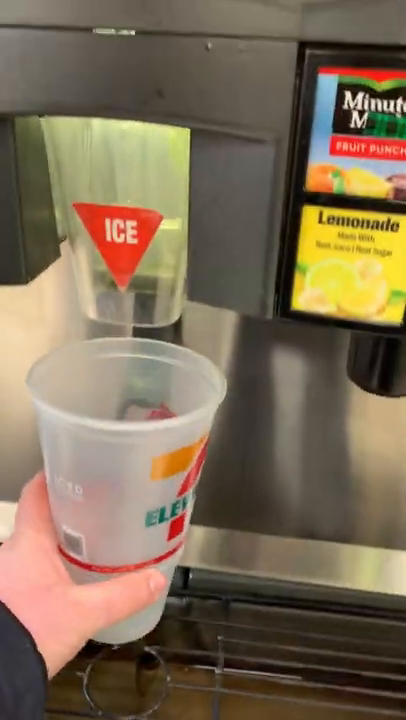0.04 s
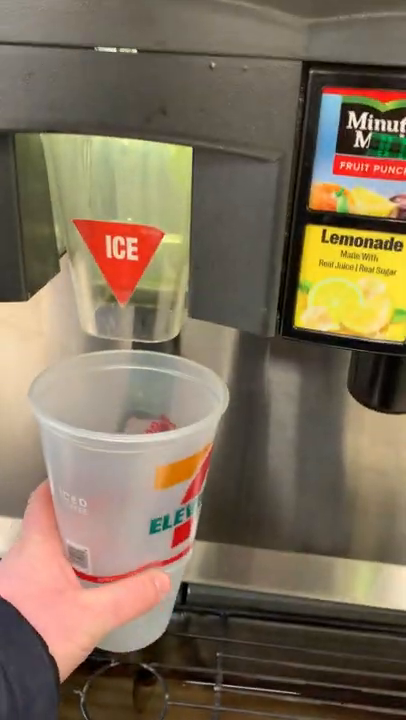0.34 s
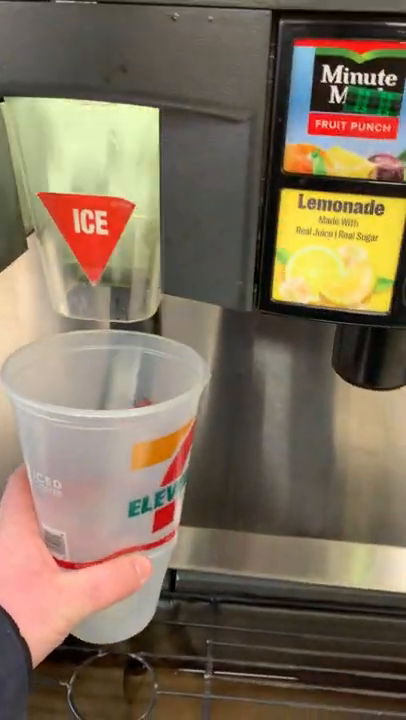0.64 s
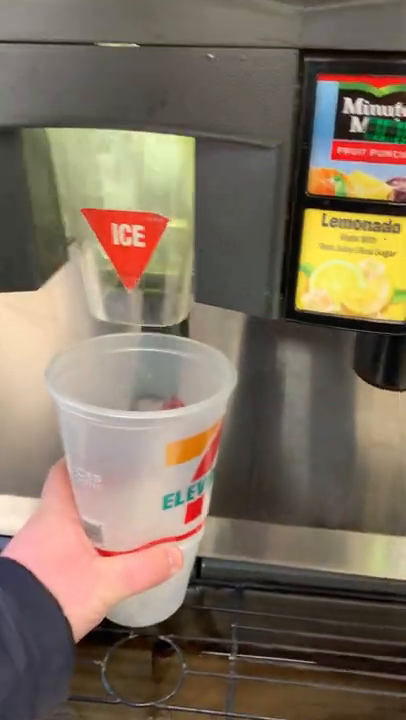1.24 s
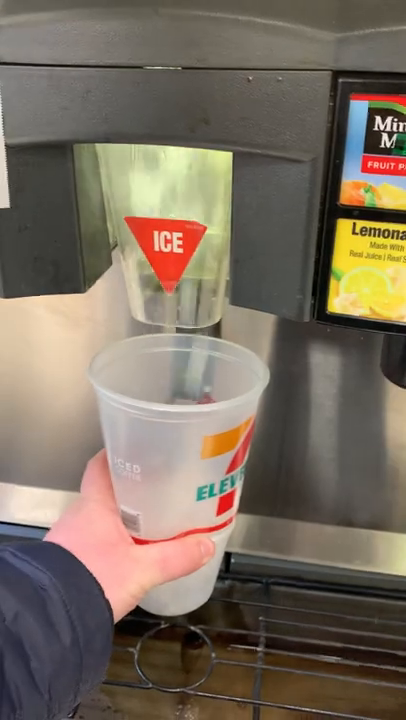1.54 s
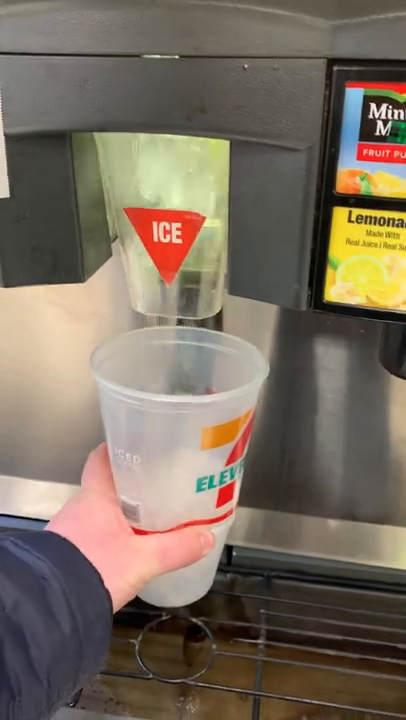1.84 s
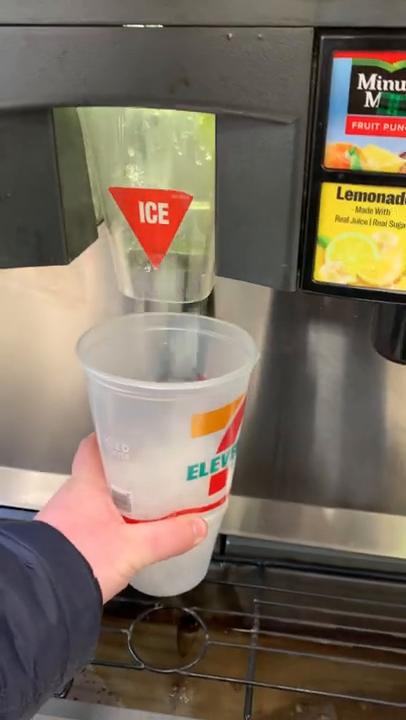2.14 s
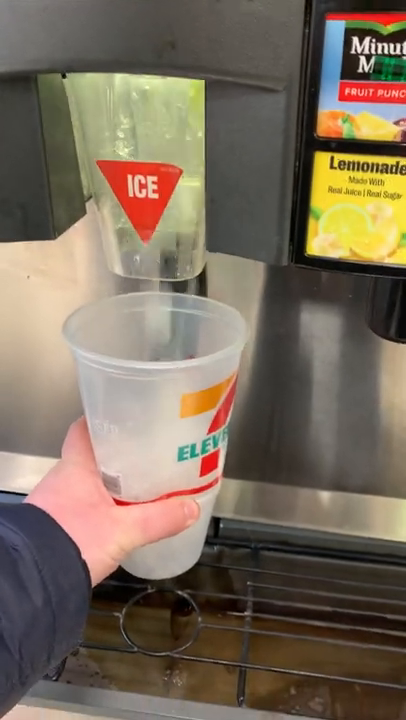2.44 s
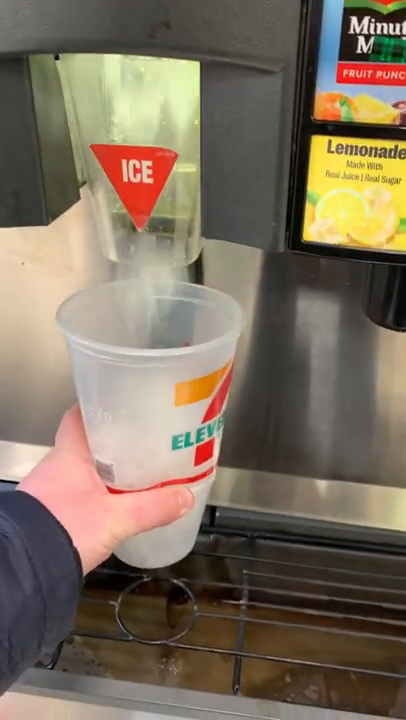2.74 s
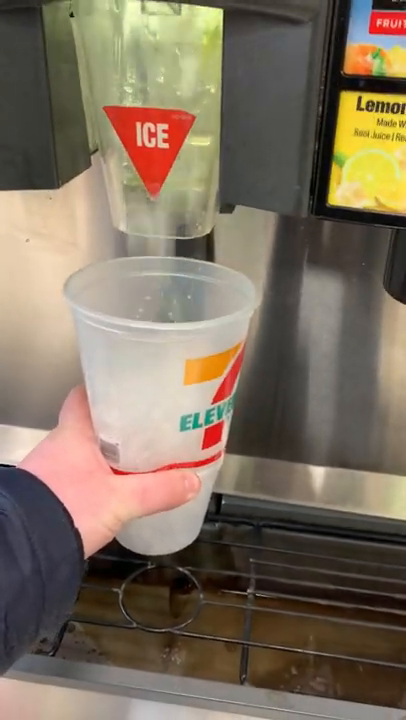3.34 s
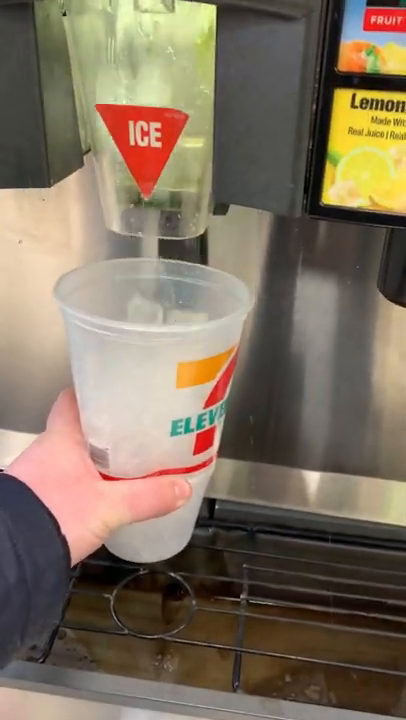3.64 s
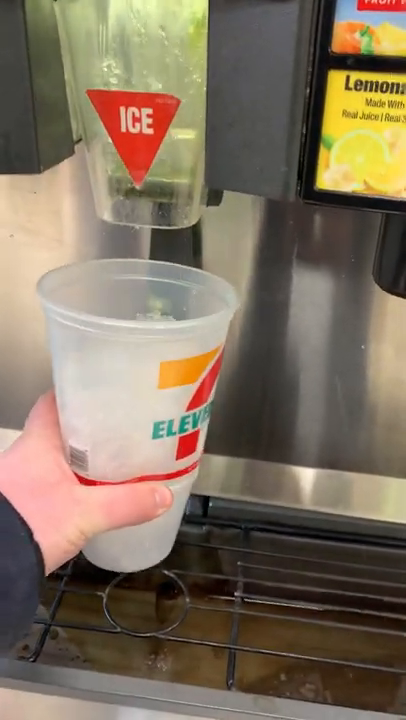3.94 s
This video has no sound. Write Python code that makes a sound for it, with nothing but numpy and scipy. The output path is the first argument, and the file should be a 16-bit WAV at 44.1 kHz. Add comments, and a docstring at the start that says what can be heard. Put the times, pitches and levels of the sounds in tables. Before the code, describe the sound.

Ice pours from a shop's drinks machine into a plastic cup close to the microphone. A lever clacks, ice slides down the chute and rattles steadily in, then a flap slaps shut. The machine hums low throughout.

```python
"""At a shop's drinks fountain, ice drops into a hand-held plastic cup close by.
The lever clacks, ice slides down the chute and pours in a rattling rush of small impacts. Big pieces
knock on the pile and excite the modes of the cup's bottom, which goes dead as it fills. The flap slaps
shut. The machine hums throughout; its steel recess and the shop reflect the ice and the clacks."""
import sys
import numpy as np
from scipy import signal
from scipy.fft import rfft, irfft, next_fast_len
from scipy.io import wavfile
from scipy.ndimage import uniform_filter1d, map_coordinates

SR = 44100
rng = np.random.default_rng(int(sys.argv[2]) if len(sys.argv) > 2 else 0)


def generate_wav(sig):
    """Save sig (samples, or channels by samples) to the path in sys.argv[1] as 16-bit PCM at SR."""
    pcm = np.round(np.clip(np.atleast_2d(sig).T, -1, 1) * 32767).astype(np.int16)
    wavfile.write(sys.argv[1], SR, pcm)


N = 176400
T = np.arange(N) / SR
FFT_SIZE = next_fast_len(N + SR // 2)
HZ = np.fft.rfftfreq(FFT_SIZE, 1 / SR)
SLIDE_START_S, TOP_HZ = 0.551, 15850

# Spectrum of small ice chips cracking. Each row: frequency in Hz, level in dB.
CRACK_SPECTRUM = [(300, -11.5), (1200, -32), (2400, -3.5), (3700, 2.5), (5000, 0.5), (6500, 0.5), (8500, 3),
                  (11000, 0), (13000, -2), (16000, -4)]
# Spectrum of larger pieces clacking. Each row: frequency in Hz, level in dB.
CLACK_SPECTRUM = [(150, -45), (350, -5), (650, -0.5), (900, 2.5), (1100, -2.5), (1600, 0), (2100, -3.5),
                  (2700, -10), (3600, -5.5), (6000, -16.5)]
# The cup's modes: its loaded bottom, the bottom's lingering ring, its wall.
# Each row: frequency in Hz, level in dB, T60 in seconds.
CUP_MODES = [(520, 4.5, 0.041), (517, -10, 0.11), (946, -7.5, 0.051)]


def amp(db):
    """Decibels to amplitude ratio."""
    return 10 ** (np.asarray(db) / 20)


def unit(x):
    """Normalisation to an rms of 1."""
    return x / np.sqrt(np.mean(x ** 2) + 1e-20)


def spectrum(points):
    """Gain per frequency, from (Hz, dB) points interpolated on a logarithmic frequency axis."""
    hz, db = np.transpose(points)
    return amp(np.interp(np.log(HZ + 1), np.log(hz + 1), db))


def curves(rows):
    """Linear interpolation in time: one value per sample for each column after the first."""
    times, *columns = np.transpose(rows)
    return [np.interp(T, times, column) for column in columns]


def wobble(knots_per_s):
    """Slow random modulation: a spline through Gaussian values."""
    return map_coordinates(rng.standard_normal(200), [T * knots_per_s], mode="mirror")


def filtered(x, response):
    """Linear filtering: the spectrum of x times a frequency response."""
    return irfft(rfft(x, FFT_SIZE) * response, FFT_SIZE)[..., :N]


def noise(gain):
    """White noise shaped by a gain per frequency, at an rms of 1."""
    return unit(filtered(rng.standard_normal(N), gain))


def resonance(centre_hz, width_hz):
    """The band-pass response of a damped oscillator."""
    return 1j * HZ * width_hz / (centre_hz ** 2 - HZ ** 2 + 1j * HZ * width_hz)


def add(track, start_s, sound):
    """Superposition of a sound on a track."""
    part = track[max(round(start_s * SR), 0):][:len(sound)]
    part += sound[:len(part)]


def strike(t60, rise_s):
    """The envelope of an impact: a quick rise and an exponential decay of 60 dB in t60 seconds."""
    t = T[:SR // 3]
    return 1000 ** (-t / t60) * (1 - np.exp(-t / rise_s))


def ring(modes, rise_s, detune):
    """Free vibration after a blow: a sum of damped modes, each varied a little in level and pitch."""
    t = T[:SR // 3]
    return sum(amp(db + rng.normal(0, 0.56)) * strike(t60, rise_s)
               * np.sin(2 * np.pi * hz * (1 + detune * rng.normal()) * t) for hz, db, t60 in modes)


def rattle(times, sizes_db, t60):
    """Incoherent contacts add in power; their envelope is levelled to a steady mean over 50 ms."""
    hits = np.bincount((times * SR).astype(int), amp(sizes_db) ** 2, N)
    power = np.abs(signal.fftconvolve(hits, strike(t60, 0.00035) ** 2)[:N])
    mean_power = np.abs(uniform_filter1d(power, size=2200))
    return np.sqrt(power / (mean_power + 1e-12))


def tinkle(times, sizes_db, centre_hz, spread, t60):
    """Each contact excites one damped mode, its frequency drawn from a log-normal distribution."""
    t = T[:SR // 25]
    hz = np.clip(centre_hz * np.exp(spread * rng.standard_normal((len(times), 1))), 0, TOP_HZ)
    waves = amp(sizes_db)[:, None] * np.sin(2 * np.pi * hz * t) * 1000 ** (-t / t60)
    samples = (times * SR).astype(int)[:, None] + np.arange(len(t))
    return unit(np.bincount(samples.ravel(), waves.ravel(), N)[:N])


def microphone_pair(x, side):
    """Phase difference places a sound left (side 1) or right (-1); the level balance is alike for both."""
    # For a source on the left. Each row: frequency in Hz, phase lead of the left channel in radians.
    phase_lead = [(150, 0), (850, -.9), (1400, -.8), (2100, .5), (2500, 1.9), (3400, 1.5), (4700, 3.14),
                  (6650, 6.28), (8900, 9.42), (13200, 15.71), (15200, 18.85)]
    # Channel balance. Each row: frequency in Hz, left minus right level in dB.
    balance = [(100, 0), (400, -1), (1200, -1), (1800, -2.8), (2300, -5), (3200, 0)]
    phase = side * np.interp(HZ, *np.transpose(phase_lead))
    share = np.array([[0.5], [-0.5]])
    return filtered(x, np.exp(1j * share * phase) * spectrum(balance) ** share)


def reflections(x, t60, shifts=20):
    """Diffuse reverberation above the bass; cross-faded tails shift its pattern as cup and pile move."""
    reflected = np.zeros(N)
    step = N // shifts
    for k in range(shifts + 1):
        span = np.arange(max(k - 1, 0) * step, min((k + 1) * step, N))
        tail = strike(t60, 0.0031) * rng.standard_normal(SR // 3)
        fade = np.cos(np.pi / 2 * (span / step - k))
        add(reflected, span[0] / SR, signal.fftconvolve(x[span] * fade, tail / np.linalg.norm(tail)))
    return filtered(reflected, HZ / (HZ + 400))


def machine():
    """Mains and motor hum form a line spectrum over broadband fan noise; a low whir enters at the end."""
    # Level of the hum and rumble as heard, dipping after the loud clacks and the first ice.
    # Each row: time in seconds, hum level in dB, rumble level in dB.
    levels = [(0.04, -27.5, -27.5), (0.48, -26, -29.5), (0.6, -41, -36.5), (0.68, -29, -22.5),
              (0.99, -53, -49), (1.4, -37, -33.5), (2.64, -41, -31), (3.62, -34.5, -31.5), (3.77, -38, -32),
              (3.84, -43, -38.5), (4.0, -41.5, -33.5)]
    # Tones of the mains and the motor. Each row: frequency in Hz, level in dB.
    hum_lines = [(59, -18.5), (99, -19.5), (120, -2.5)]
    # Spectra of the fans' rumble and hiss. Each row: frequency in Hz, level in dB.
    rumble_spectrum = [(42, -46), (55, 1), (75, -4), (100, 4), (140, 0.5), (175, -6.5), (225, -1.5),
                       (350, -5.5), (600, -17.5), (1500, -24.5), (4000, -32), (16000, -49.5)]
    hiss_spectrum = [(300, -5), (1000, 3.5), (2500, -12), (4500, -5), (7500, -29), (10000, -10.5),
                     (16000, -17)]
    waver_db, whir_hz, whir_start_s = 2.5, 187, 3.75
    hum_db, rumble_db = curves(levels)
    hum = np.zeros(N)
    for hz, db in hum_lines:
        waver = waver_db * wobble(9) * (T > SLIDE_START_S)
        hum += np.sqrt(2) * amp(db + waver) * np.sin(2 * np.pi * (hz * T + rng.random()))
    whir_onset = np.clip((T - whir_start_s) / 0.019, 0, 1)
    whir = amp(-40.5) * np.sqrt(2) * np.sin(2 * np.pi * whir_hz * T) * whir_onset
    rumble = amp(rumble_db - 4) * noise(spectrum(rumble_spectrum))
    hiss = amp(-52.5) * noise(spectrum(hiss_spectrum))
    return amp(hum_db) * hum + whir + rumble + hiss


def lever_and_flap():
    """Friction scrapes the lever to its stop; impacts excite the modes of lever, flap and housing."""
    # Lever and flap impacts. Each row: start in seconds, treble in dB, body in dB, rise in seconds.
    clacks = [(0.264, -27, -51, 0.0014), (0.429, -7, -10, 0.0033), (0.449, -28, -8, 0.0034),
              (.459, -6, -22, 0.00058), (0.5667, -34.5, -33, 0.00091), (3.718, -9.5, -24, 0.0011),
              (3.726, -11, -14, 0.0017), (3.915, -23, -30.5, 0.00073)]
    # Blows to the housing. Each row: start in seconds, level in dB.
    thuds = [(0.454, -24), (3.726, -17)]
    # Modes of the three struck parts. Each row: frequency in Hz, level in dB, T60 in seconds.
    lever_modes = [(1170, -4, 0.011), (1985, -21, 0.076), (5160, -18, 0.049), (7330, -11, 0.032),
                   (14600, -4, 0.02)]
    flap_modes = [(1228, 2, 0.031), (1780, -10, 0.097)]
    housing_modes = [(135.6, -0.5, 0.33), (186.4, -5, 0.37), (345, -5.5, 0.11)]
    scrape_peak_s, scrape_db_per_s, flap_shut_s = 0.4305, 1000, 3.727
    sharp_share, settle_s = 0.11, 0.035  # a thud starts sharp and sags to its pitch
    treble, body, rings = np.zeros((3, N))
    scrape = amp(-24.5 - scrape_db_per_s * np.abs(T - scrape_peak_s))
    for start, treble_db, body_db, rise_s in clacks:
        add(treble, start, amp(treble_db) * strike(0.042, rise_s))
        add(body, start, amp(body_db) * strike(0.043, rise_s))
        add(rings, start, amp(treble_db + 1.5) * ring(lever_modes, rise_s, detune=0.0052))
    add(rings, flap_shut_s, amp(-14) * ring(flap_modes, rise_s=0.0009, detune=0))
    for start, db in thuds:
        thud = ring(housing_modes, rise_s=0.0088, detune=0.008)
        t = T[:len(thud)]
        warped_time = t + sharp_share * settle_s * (1 - np.exp(-t / settle_s))
        add(rings, start, amp(db) * np.interp(warped_time, t, thud))
    treble_noise = (treble + scrape) * noise(spectrum(CRACK_SPECTRUM))
    body_noise = (body + scrape / 2) * noise(spectrum(CLACK_SPECTRUM))
    return treble_noise + body_noise + rings


def chute_slide():
    """Sliding friction and tumbling impacts swell until the ice leaves the chute's mouth."""
    # Spectrum of ice scraping the chute. Each row: frequency in Hz, level in dB.
    friction_spectrum = [(200, 2.5), (700, -1), (1200, 0), (2000, -7), (2700, -8.5), (4000, -5),
                         (7000, -11), (11000, -7.5), (16000, -18)]
    end_s, swell_db_per_s, tumbles = 0.769, 60, 36
    swell_db = -swell_db_per_s * np.abs(T - end_s)
    gate = np.interp(T, [SLIDE_START_S - 0.03, SLIDE_START_S + 0.062, end_s, end_s + 0.026], [0, 1, 1, 0])
    when, size = rng.random((tumbles, 2)).T
    length_s = end_s - SLIDE_START_S
    bumps = tinkle(SLIDE_START_S + when * length_s, 10 * size, centre_hz=1054, spread=0.28, t60=0.042)
    bumps *= np.sqrt(length_s / T[-1])  # rms near 1 within the slide
    friction = noise(spectrum(friction_spectrum))
    return gate * (amp(-26.5 + swell_db) * friction + amp(-32.5 + swell_db / 2) * bumps)


def ice_pour():
    """Random impacts crack, clatter and drive the cup's modes, which give way to the pile as it fills."""
    # Strength of the pour. Each row: time in seconds, chips' treble in dB, pieces' midrange in dB.
    flow = [(0.75, -70, -55), (0.84, -24.5, -25.5), (0.98, -31.5, -37.5), (1.19, -34, -42),
            (1.44, -35, -40), (1.61, -33.5, -39), (1.96, -32.5, -40.5), (2.56, -33, -41.5),
            (3.19, -33.5, -41.5), (3.43, -35, -45), (3.61, -33.5, -42.5), (3.85, -38.5, -47),
            (4.0, -44, -56)]
    # Clumps and gaps in the flow. Each row: centre in seconds, gain in dB, half length in seconds.
    clumps = [(1.305, -7.5, 0.032), (1.392, -14, 0.013), (1.44, 5.5, 0.038), (1.543, -2.5, 0.022),
              (1.77, 6, 0.053), (2.397, -5, 0.087), (2.528, 3.5, 0.017), (2.771, -8.5, 0.024),
              (2.873, 3.5, 0.022), (3.444, -8.5, 0.015), (3.5, -4.5, 0.023), (3.606, -13, 0.018),
              (3.693, 9, 0.019)]
    contacts_per_s, size_spread_db = 380, 3.5
    first_landing_s, piled_up_s, deadening_db_per_s = 0.84, 2.7, 2.5
    clumps_db = sum(db * np.exp(-((T - centre) / half_length) ** 2) for centre, db, half_length in clumps)
    treble_db, middle_db = curves(flow) + clumps_db
    when, size, weight = rng.random((3, contacts_per_s * N // SR))
    times = when * T[-1]
    size_db = -size_spread_db * np.log(1 - 0.95 * size)  # many small contacts, few large
    weight_db = size_db + 8 * weight
    chips = noise(spectrum(CRACK_SPECTRUM)) * rattle(times, size_db, t60=0.045)
    chips += amp(-9) * tinkle(times, size_db, centre_hz=6495, spread=0.45, t60=0.029)
    shaking = rattle(times, weight_db, t60=0.024)
    clatter = noise(spectrum(CLACK_SPECTRUM)) * shaking
    clatter += amp(2) * tinkle(times, weight_db, centre_hz=1236, spread=0.436, t60=0.04)
    response = sum(amp(db) / (1 + 1j * (HZ - hz) * t60 * np.pi / np.log(1000)) for hz, db, t60 in CUP_MODES)
    cup = unit(filtered(shaking * rng.standard_normal(N), response)) * (T > first_landing_s)
    cup *= amp(4.5 - deadening_db_per_s * (T - first_landing_s))
    filled = np.interp(T, [first_landing_s, piled_up_s], [0, 1])
    pile = amp(1) * filled * shaking * noise(resonance(centre_hz=890, width_hz=480) ** 2)
    start = flow[0][0]
    flowing = np.interp(T, [start - 0.02, start], [0, 1])
    return flowing * (amp(treble_db + 2.5) * chips + amp(middle_db - 2.5) * (clatter + cup + pile))


def big_pieces():
    """Each impact gives a noise burst and rings the piece and the cup's wall; some thump the bottom."""
    # Pieces landing. Each row: start in seconds, pitch in Hz, clack level in dB, crack level in dB.
    knocks = [(0.77, 1215, -12.5, -16), (0.781, 830, -14, -13), (0.79, 865, -16, -19),
              (0.817, 940, -35, -24), (0.836, 910, -12, -15), (0.843, 1205, -10, -26),
              (0.855, 1256, -13.5, -20), (0.873, 1120, -17, -15), (0.962, 880, -27, -25),
              (1.011, 1010, -27.5, -22), (1.172, 1580, -28, -26), (1.333, 916, -24, -25),
              (1.369, 1550, -17.5, -22.5), (1.418, 880, -25, -24.5), (1.433, 1500, -19, -20.5),
              (1.462, 945, -22, -20.5), (1.472, 940, -36, -21.5), (1.5, 930, -23.5, -20),
              (1.556, 940, -53, -23), (1.571, 2350, -25.5, -19.5), (1.577, 1614, -23, -24.5),
              (1.67, 980, -25, -26), (1.725, 1590, -16.5, -23), (1.771, 1240, -26, -22.5),
              (1.787, 1500, -37, -17.5), (1.811, 890, -20, -22), (1.838, 1480, -23, -32),
              (1.9, 1250, -30, -21.5), (2.031, 1180, -26, -21), (2.102, 905, -20.5, -25.5),
              (2.173, 920, -23, -21), (2.239, 1610, -17, -21), (2.393, 1146, -19, -41),
              (2.408, 1763, -18, -17.5), (2.437, 1490, -23.5, -39), (2.473, 974, -21.5, -32),
              (2.499, 851, -27, -34), (2.526, 1530, -18, -27), (2.543, 990, -31, -19),
              (2.631, 1600, -23.5, -29.5), (2.754, 827, -21.5, -39), (2.836, 970, -25.5, -21.5),
              (2.882, 910, -26, -28), (3.025, 1620, -27, -27), (3.041, 848, -17.5, -28),
              (3.097, 900, -24, -21.5), (3.12, 1562, -16.5, -25), (3.175, 710, -22, -20),
              (3.192, 940, -25, -25), (3.236, 834, -18.5, -28), (3.269, 870, -23.5, -23.5),
              (3.277, 1570, -20.5, -23.5), (3.316, 1630, -21.5, -24.5), (3.404, 985, -23, -25),
              (3.46, 1060, -33, -26.5), (3.471, 940, -25, -23.5), (3.586, 2050, -18.5, -14),
              (3.615, 1740, -18, -40), (3.623, 1780, -18.5, -15.5), (3.668, 1000, -26, -25),
              (3.706, 1480, -18.5, -31)]
    # Modes of one piece. Each row: multiple of its pitch, level in dB, T60 in seconds.
    piece_modes = [(1.002, -2.5, 0.034), (1.35, -11, 0.025), (2.2, -4, 0.008)]
    # Blows to the cup's bottom, whose pitch shifts with its load.
    # Each row: start in seconds, pitch in Hz, level in dB.
    thumps = [(.784, 556, -10), (.819, 503, -14), (.837, 503, -8.5), (.852, 510, -14), (.876, 502, -15.5),
              (.962, 470, -23), (1.010, 476, -23), (1.097, 500, -24.5), (1.175, 523, -20),
              (1.337, 527, -15), (1.435, 488, -14.5), (1.467, 510, -9), (1.572, 537, -17.5),
              (1.814, 525, -13), (1.911, 525, -22.5), (2.104, 482, -20), (2.546, 481, -22.5),
              (3.192, 565, -26)]
    ice_rise_s, cup_rise_s = 0.00059, 0.0033
    clack, crack, tones = np.zeros((3, N))
    (_, bottom_db, bottom_t60), lingering, wall = CUP_MODES
    for start, pitch_hz, clack_db, crack_db in knocks:
        add(clack, start, amp(clack_db - 2) * strike(0.052, ice_rise_s))
        add(crack, start, amp(crack_db + 0.5) * strike(0.045, ice_rise_s))
        add(crack, start, amp(crack_db + 6.5) * strike(0.007, 0.0001))  # the opening snap
        modes = [(pitch_hz * multiple, db, t60) for multiple, db, t60 in piece_modes]
        add(tones, start, amp(clack_db + 3.5) * ring(modes, ice_rise_s, detune=0.019))
        add(tones, start, amp(clack_db - 5) * ring([wall], cup_rise_s, detune=0.06))
    for start, pitch_hz, db in thumps:
        modes = [(pitch_hz, bottom_db, bottom_t60), lingering, wall]
        add(tones, start, amp(db + 0.5) * ring(modes, cup_rise_s, detune=0.015))
    return clack * noise(spectrum(CLACK_SPECTRUM)) + crack * noise(spectrum(CRACK_SPECTRUM)) + tones


def scene():
    """Direct sound from the left adds to reflections from the recess on the right and the shop around."""
    near = chute_slide() + ice_pour() + big_pieces() + lever_and_flap()
    recess = microphone_pair(reflections(near, t60=0.035), side=-1.01)
    shop = sum(microphone_pair(reflections(near, t60=0.19), side) for side in (1, -0.97))
    direct = microphone_pair(near + machine(), side=1)
    return direct + amp(-6.5) * recess + amp(-20) * shop


def record(dry):
    """Hard clipping at full scale, then a sharp low-pass band limit."""
    return filtered(np.clip(dry, -1, 1), HZ < TOP_HZ)


dry = scene()
out = record(dry)
generate_wav(out)
```